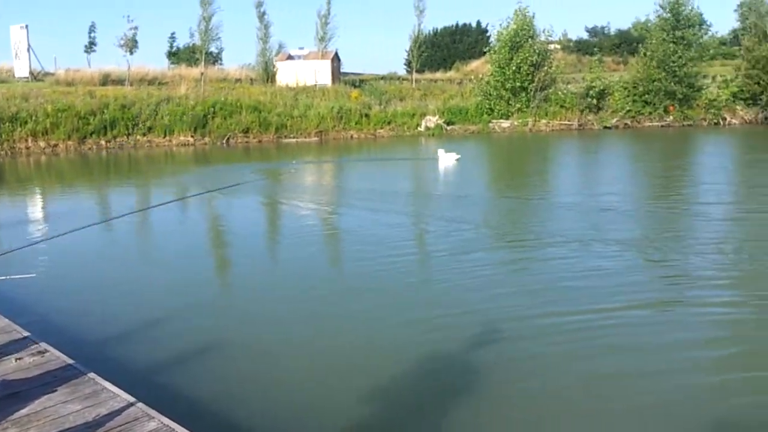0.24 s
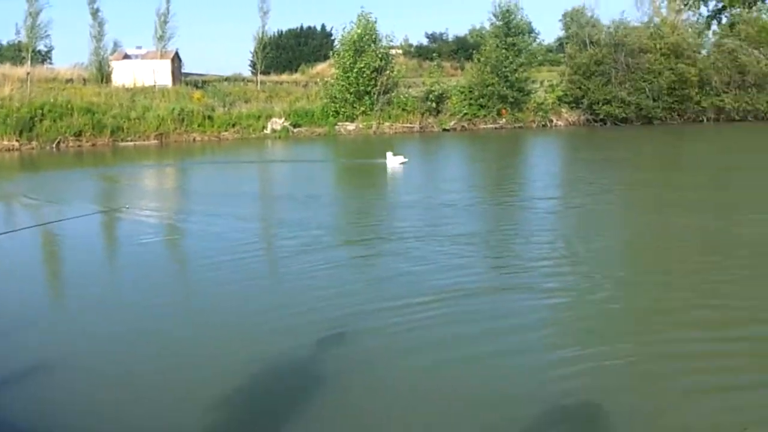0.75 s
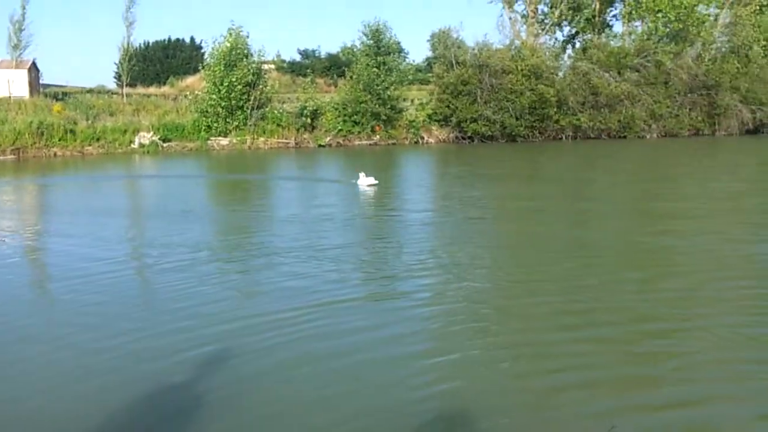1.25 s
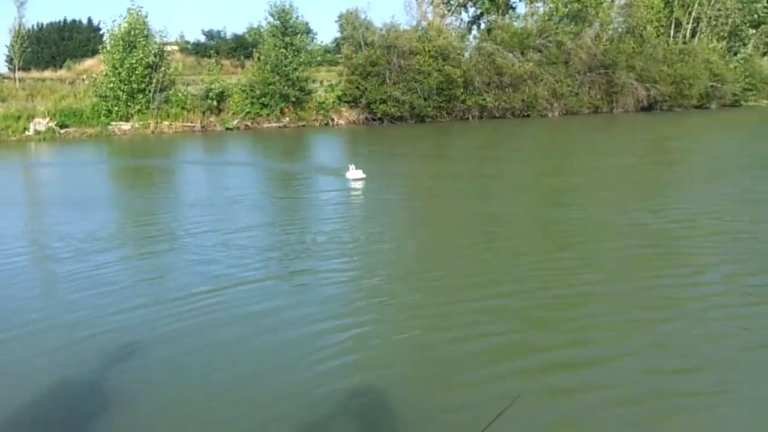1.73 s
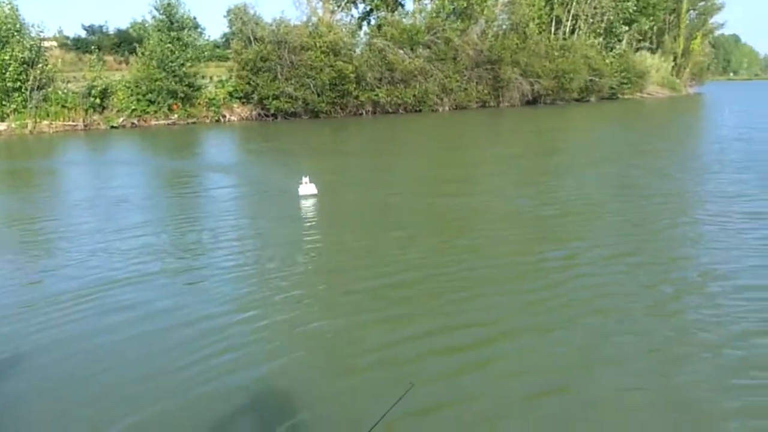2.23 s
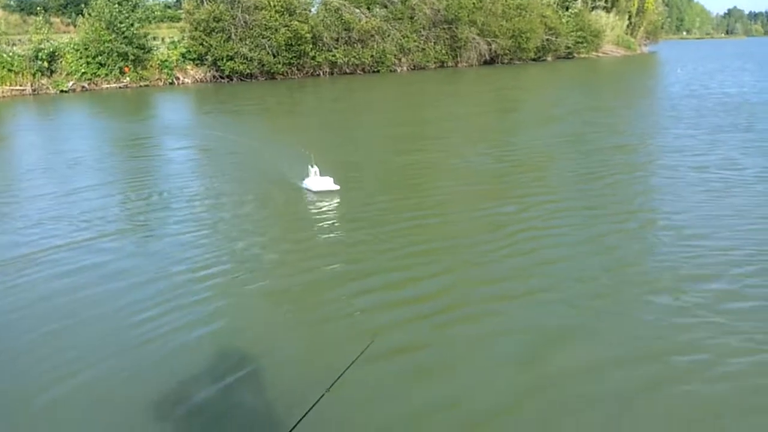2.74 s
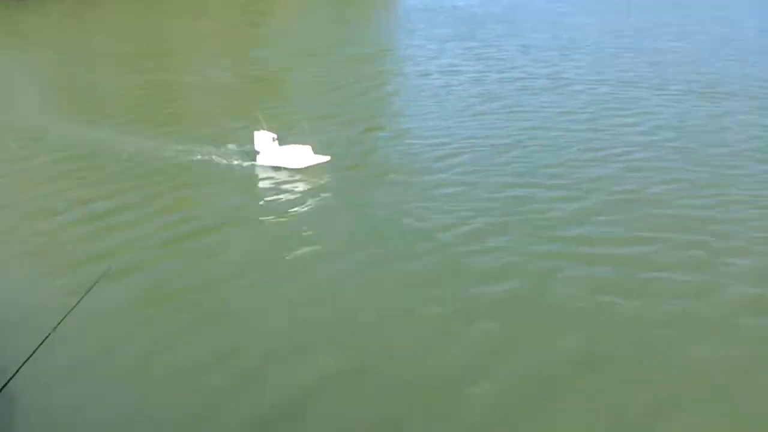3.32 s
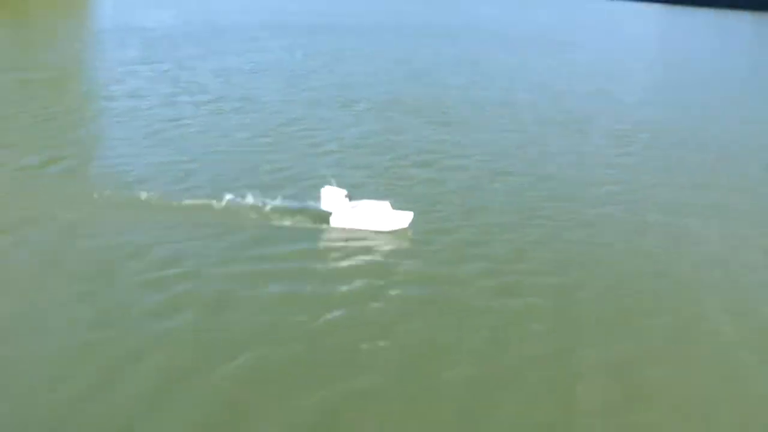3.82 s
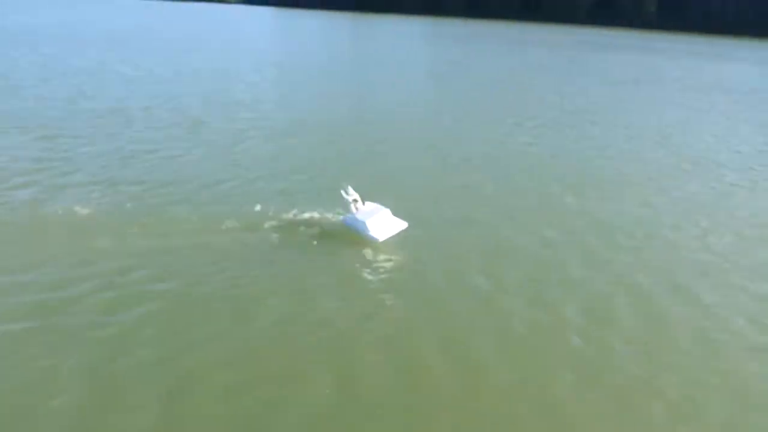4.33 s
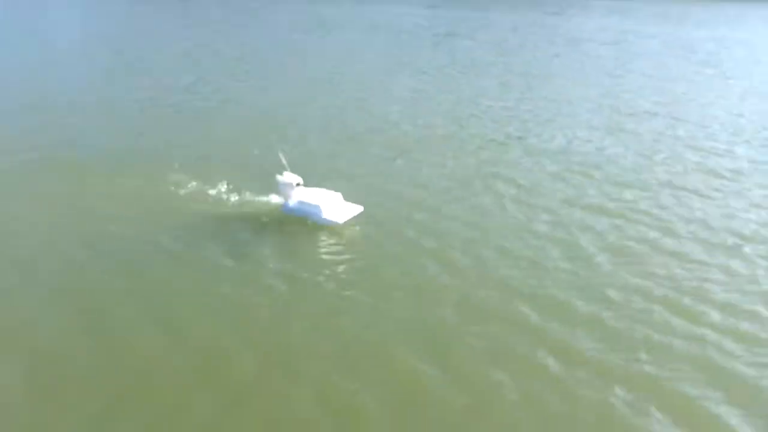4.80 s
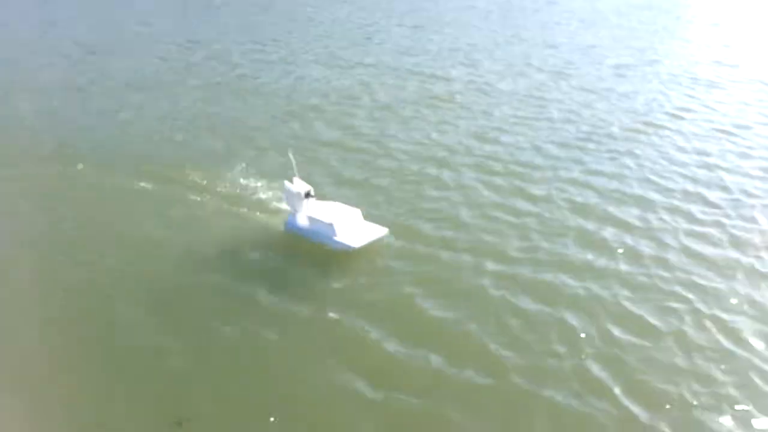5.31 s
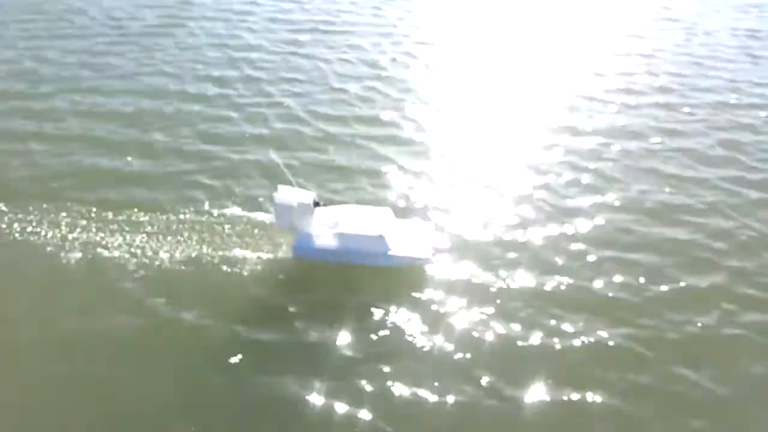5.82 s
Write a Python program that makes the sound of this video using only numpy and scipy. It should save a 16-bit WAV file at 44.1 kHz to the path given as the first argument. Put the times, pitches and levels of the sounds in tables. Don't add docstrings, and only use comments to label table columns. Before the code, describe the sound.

A model airboat runs steadily across open water towards a hand-held camera. At first harsh, overloaded wind slaps and tearing crackles nearly cover its low rasping drone. The wind breaks up into separate knocks, mostly gone past four seconds, leaving the fast propeller's buzzing hum, bright rough hiss and faint high electric singing, close and slightly hollow from reflection off the lake.

```python
import sys
import numpy as np
from scipy import signal
from scipy.fft import rfft, irfft, next_fast_len
from scipy.io import wavfile
from scipy.ndimage import uniform_filter1d, minimum_filter1d, map_coordinates

SR = 44100
rng = np.random.default_rng(int(sys.argv[2]) if len(sys.argv) > 2 else 0)


def dump(signal):
    limited = np.clip(np.atleast_2d(signal).T, -1, 1)
    pcm = np.round(limited * 32767).astype(np.int16)
    wavfile.write(sys.argv[1], SR, pcm)


def elevation(decibels):
    levels = np.asarray(decibels, float)
    return 10 ** (levels / 20)


N = 267246
TOP_HZ = 14650


def unit(x):
    return x / np.sqrt(np.mean(x ** 2) + 1e-20)


def along(points, hz):
    f, v = np.transpose(points)
    return np.interp(np.log(hz + 1), np.log(f + 1), v)


def curves(rows):
    s, *cols = np.transpose(rows)
    return [np.interp(np.arange(N) / SR, s, c) for c in cols]


def wobble(rate):
    coarse = np.arange(0, N + 16, 16)
    knots = rng.standard_normal(N // 100)
    return np.interp(np.arange(N), coarse, map_coordinates(knots, [coarse * rate / SR]))


def filtered(x, response):
    m = next_fast_len(N + 8192)
    return irfft(rfft(x, m) * response(np.fft.rfftfreq(m, 1 / SR)), m)[..., :N]


def passing_db(rows, edge_s, rest_db):
    t = np.arange(0, N / SR, .002)
    start, hold, db = np.transpose(rows)[:, :, None]
    rise = (t - start) / edge_s[0]
    fall = (start + hold - t) / edge_s[1]
    shape = np.clip(1 + np.minimum(rise, fall), 0, 1) ** 2
    power = elevation(2 * rest_db) + np.sum((elevation(db) * shape) ** 2, axis=0)
    return np.interp(np.arange(N) / SR, t, 10 * np.log10(power))


def bumps_db(rows):
    t = np.arange(0, N / SR, .001)
    s, ms, db = np.transpose(rows)[:, :, None]
    bumps = db * np.exp(-((t - s) * 1000 / ms) ** 4)
    return np.interp(np.arange(N) / SR, t, np.sum(bumps, axis=0))


def rush(spectrum, patchy_db, spiky_db=0, shade=None):
    kicks = rng.standard_normal(N) * elevation(spiky_db * wobble(300))
    bins, s, z = signal.stft(kicks, SR, nperseg=512)
    patches = uniform_filter1d(rng.standard_normal(z.shape), size=5, axis=0)
    patches = uniform_filter1d(patches, size=10, axis=1)
    gain = elevation(patchy_db * unit(patches))
    if shade:
        gain = gain * shade(bins, s)
    noise = signal.istft(z * gain, nperseg=512)[1][:N]
    return unit(filtered(noise, lambda hz: elevation(along(spectrum, hz))))


def tone(order, db, angle, unsteady_db):
    shake = np.sqrt(order) * (.2 * wobble(12) + .17 * wobble(50))
    flutter_db = unsteady_db * min(order, 12) ** .5 * (.14 * wobble(30) + .4 * wobble(110))
    return np.sqrt(2) * elevation(db + flutter_db) * np.sin(order * angle + shake + rng.uniform(0, 2 * np.pi))


# (t/s, lower band f/Hz, upper band f/Hz, level/dB)
HULL_SHADOW = [(0, 1950, 2750, -3), (2.3, 1970, 2730, -2), (3.1, 2030, 3000, -3), (3.8, 2150, 3130, -2.5),
               (4.15, 2380, 3260, -3), (4.45, 2190, 3170, -3.5), (4.7, 2300, 3240, -7),
               (5.3, 2370, 3220, -6.5), (5.649, 2700, 2950, -3), (6.06, 2750, 2940, -4.5)]


def shadow(hz, s):
    at, low_hz, high_hz, db = np.transpose(HULL_SHADOW)
    width_hz = 148

    def dip(centre_hz):
        return np.exp(-((hz[:, None] - np.interp(s, at, centre_hz)) / width_hz) ** 2)

    return elevation(np.interp(s, at, db) * (1.04 * dip(low_hz) + dip(high_hz)))


# (t/s, delay/ms)
WATER_ECHO = [(0, 1.62), (1.3, 1.68), (2.4, 1.62), (3.2, 1.46), (3.85, 1.42), (4.1, 1.31), (5.15, 1.3),
              (5.55, 1.16), (5.8, 1.07), (6.06, 1.0)]


def over_water(x):
    late = np.arange(N) - curves(WATER_ECHO)[0] * SR / 1000
    gain = .56 * elevation(2 * wobble(6))

    def bounce(hz):
        ripples = .4 + .6 / (1 + (hz / 8600) ** 6)
        hull = 1 - .6 / (1 + (hz / 3600) ** 8)
        return ripples * hull

    echo = filtered(np.array([map_coordinates(v, [late]) for v in x]), bounce)
    return x + gain * echo


# (t/s, f/Hz)
SHAFT_SPEED = [(0, 212), (.4, 213.5), (1.05, 214.5), (1.45, 217.6), (2.2, 218), (2.5, 216.6), (3.05, 213.8),
               (3.45, 213.4), (3.9, 212.3), (4.33, 212.3), (4.48, 213.1), (4.9, 213.2), (5.4, 213.6),
               (5.78, 213.4), (6.06, 212.7)]
# (t/s, level/dB)
HISS_LEVEL = [(0, -25.5), (.2, -31), (.98, -31), (1.06, -22), (1.2, -16.5), (1.66, -18), (1.73, -28),
              (2.0, -26.5), (2.09, -17), (2.9, -13), (3.13, -16.5), (3.4, -13.5), (3.56, -15.5),
              (4.14, -17), (4.44, -11), (4.65, -14.5), (5.1, -12.5), (6.06, -12.5)]
# (start t/s, hold t/s, level/dB over the hiss)
BLADE_SWEEPS = [
    [(0, 0.24, 2), (.55, .1, 6), (1.05, 0.42, -6), (2, 0.046, -5), (3.04, 0.23, -4), (4.1, 0.32, -3.5),
     (4.6, 0.37, -4.5), (5.1, 0.39, -9), (5.6, 0.2, -5.5)],
    [(0, 0.26, 2.5), (1, 0.17, -8), (2, 0.4, -17), (3.05, 0.1, -6.5), (3.4, 0.047, -2), (3.66, 0.075, 5),
     (3.86, 0.25, 4.5), (4.5, 0.25, -12.5), (5.85, 0.13, -8)],
    [(0, 1.8, -7), (1.2, 0.23, -5.5), (1.8, 0.5, -3), (3.42, 0.6, -7), (4.6, 0.083, -10.5),
     (5.65, 0.32, -7.5)],
    [(.5, 1, -14), (1.2, 0.57, -10.5), (2.05, 0.57, -11.5), (3.15, 0.12, -14), (5.45, 0.17, -16.5),
     (5.68, 0.19, -5)],
]
# (start t/s, hold t/s, level/dB over the hiss)
MOTOR_SWEEPS = [
    [(0, .3, -19), (1.7, 0.5, -13), (3, 0.053, -10), (5.35, 0.15, -21)],
    [(2.55, 0.15, -25), (3.65, 0.3, -25), (4.3, 0.21, -15), (4.75, 0.56, -19), (5.75, 0.33, -28)],
]
# (start t/s, hold t/s, level/dB over the hiss)
FRAME_SWEEPS = [
    [(.3, .1, -13), (1.3, 0.74, -14.5), (2, .7, -17.5), (3.85, 0.29, -13), (4.6, 0.16, -17.5),
     (5.6, 0.2, -15)],
    [(0, 0.35, -10), (5.45, 0.35, -14)],
    [(.03, 0.19, -2), (1.95, 0.15, -17), (2.6, 0.075, -38), (4.25, 0.16, -18.5), (4.75, 0.26, -21.5),
     (5.45, 0.53, -18)],
    [(2.75, 0.047, -25), (3.4, .15, -23), (4.35, 0.1, -32), (4.85, 0.43, -34), (5.75, .3, -25)],
    [(3.9, 0.19, -16), (4.3, 0.14, -15), (5, 0.15, -14.5), (5.9, .15, -23)],
    [(3.35, 0.25, -17), (4.55, 0.25, -21), (5.35, 0.21, -21), (5.9, 0.13, -22)],
    [(3.85, 0.68, -21.5), (5.1, 0.13, -19)],
    [(3.081, 0.81, -9)],
    [(.32, .03, -3), (1.45, 0.095, -12.5), (4.4, .1, -16.5), (4.95, 0.53, -17.5), (5.95, .1, -17.5)],
]
RESTING_LEVEL = [-15, -13.5, -17.5, -41, -16.5, -45, -17.5, -36, -23, -25, -26.5, -28.5, -42, -23, -27.5]
# (shaft order, level/dB over the hiss)
FAINT_TONES = [(1, -30.5), (11, -35), ]
# (f/Hz, level/dB per Hz)
LEFT_COLOUR = [(60, -38), (150, -18), (250, -7.5), (540, -13), (1100, -7.5), (2400, -11), (3600, -6.5),
               (5500, -10), (7200, -11.5), (9000, -3.5), (10500, -0.5), (11700, 3), (13000, -4),
               (14500, -9)]
# (f/Hz, level/dB per Hz)
RIGHT_COLOUR = [(60, -55), (150, -21), (250, -11), (540, -13.5), (1100, -6), (2400, -5.5), (3300, -11.5),
                (4000, -4), (4700, 4.5), (5300, 0.5), (6200, -10.5), (8000, -13.5), (11000, -16),
                (14500, -17.5)]
# (f/Hz, lead/radians)
LEFT_LEAD = [(0, 1), (260, 2.5), (1890, 2.5), (2330, 4), (3450, 4), (3790, 1.5), (4480, 2), (4820, 4.5),
             (5600, 4.5), (7410, 5), (7670, 3), (12300, 2.5), (14000, -11), (14500, 10)]
# (f/Hz, likeness 0 to 1)
LIKENESS = [(200, 1), (600, 1), (2500, 0.41), (4000, 0.45), (9000, 0.42), (12000, 0.32)]
# (t/s, half width/ms, level/dB)
GAIN_CONTROL = [
    (.35, 44, 7),
    (.58, 23, 2),
    (.855, 47, 5.5),
    (1.56, 35, -3),
    (2.44, 31, -1.5),
]


def airboat():
    shaft_hz, = curves(SHAFT_SPEED)
    angle = 2 * np.pi * np.cumsum(shaft_hz) / SR
    orders = (2, 4, 6, 10, 42, 22, 8, 9, 12, 24, 18, 20, 26, 3, 14)
    tones = np.zeros(N)
    for order, sweeps, rest_db in zip(orders, BLADE_SWEEPS + MOTOR_SWEEPS + FRAME_SWEEPS, RESTING_LEVEL):
        db = passing_db(sweeps, edge_s=(0.22, 0.36), rest_db=rest_db)
        tones += tone(order, db, angle, unsteady_db=2.49)
    for order, db in FAINT_TONES:
        tones += tone(order, db + 3 * wobble(3.0), angle, unsteady_db=5.0)
    tones *= 1 + 0.15 * np.cos(angle + 0.65 * wobble(7))

    beat = 1 + 0.22 * np.cos(2 * angle) + 0.26 * np.cos(4 * angle + 1.0)
    swell = elevation(1.34 + 0.24 * wobble(14) + 0.78 * wobble(60))
    hisses = np.array([rush(LEFT_COLOUR, patchy_db, shade=shadow) for patchy_db in (0.88, 1.2)])
    shared, own = beat * swell * over_water(hisses)
    heard = elevation(curves(HISS_LEVEL)[0] + bumps_db(GAIN_CONTROL))

    def alike(hz):
        return np.clip(along(LIKENESS, hz), 0, 1)

    def right_port(hz):
        cavity_db = 1.64 / (1 + ((hz - 4700) / 130) ** 2)
        colour_db = along(RIGHT_COLOUR, hz) - along(LEFT_COLOUR, hz)
        return elevation(colour_db + cavity_db) * np.exp(-1j * along(LEFT_LEAD, hz))

    right = tones + filtered(shared, alike)
    right = right + filtered(own, lambda hz: np.sqrt(1 - alike(hz) ** 2))
    return np.array([heard * (tones + shared), filtered(heard * right, right_port)])


# (start t/s, hold t/s, level/dB)
GUSTS = [
    [(0, 6.6, -25), (0, 0.49, -15.5), (.1, 0.081, -17), (.55, 0.28, -16), (1.05, 0.036, -24),
     (1.52, 0.024, -25), (1.98, 0.83, -21.5), (2.95, 0.34, -20.5), (3.36, 0.47, -17), (4.04, 0.19, -17.5)],
    [(0, 3.35, -23.5), (0, 0.0078, -9.5), (.05, 1.1, -15), (.12, 0.31, -15), (1.2, 0.075, -14.5),
     (1.3, 0.56, -18.5), (.2, 0.039, -17), (.42, 0.59, -8.5), (.49, 0.059, -2), (.62, 0.02, -1),
     (.74, 0.061, -3), (.9, 0.034, -9.5), (1.53, 0.022, -9.5), (1.66, 0.13, -8), (1.82, 0.18, -10.5),
     (2.05, 0.44, -17.5), (2.41, 0.04, -12.5), (2.55, 0.31, -18.5), (3.38, 0.025, -33), (3.98, 0.074, -28)],
]
# (t/s, half width/ms, level/dB)
LEFT_LULLS = [
    (.057, 7, -8),
    (.235, 29, -7),
    (.405, 12, -7),
    (.65, 12, -7),
    (.95, 90, 3.5),
    (2.47, 30, -3),
    (3.9, 68, -6),
]
# (t/s, half width/ms, level/dB)
RIGHT_LULLS = [(.03, 4.2, -14), (.065, 8.7, -14), (.155, 9.3, -11), (.32, 27, -11), (.445, 6.2, -8),
               (.468, 5.1, -13), (.505, 5, -17), (.603, 3.7, -18), (.703, 4.5, -14), (.765, 4.2, -12),
               (.805, 5.8, -14), (.838, 14, -9), (.883, 19, -7), (.945, 3.5, -1), (1.02, 19, -3),
               (1.6, 17, 0), (1.685, 4.9, -9), (1.72, 4.3, -6), (1.787, 18, -14), (1.856, 13, -4),
               (1.883, 4.1, 3.5), (1.935, 8.1, -6)]
# (f/Hz, level/dB per Hz)
BUFFET_COLOUR = [(30, -21), (100, -9), (200, -0.5), (350, 2), (550, -3.5), (1000, -7), (2000, -23),
                 (5000, -31.5), (15000, -76)]
# (f/Hz, level/dB per Hz)
TEARING_COLOUR = [(100, -56), (300, 2), (600, 7), (1000, 1), (1500, -10), (2500, -19.5), (5000, -26),
                  (15000, -50)]
# (f/Hz, level/dB per Hz)
CRACKLE_COLOUR = [(300, -14), (800, 7.5), (1500, 11), (2500, -1), (4000, -8), (8000, -39), (15000, -50)]
# (t/s, level/dB, fade/ms)
SUDDEN_TEARS = [(0.082, -23, 8), (0.129, -23, 6.1), (0.231, -5, 31), (.402, -2, 12), (.734, -7, 17),
                (.855, -14, 9.9), (.886, -16, 10), (0.485, 3, 89), (0.524, 25, 11), (.555, -1, 9.4),
                (0.586, 32, 7.6), (0.616, 11, 6.6), (0.66, 35, 15), (0.68, 12, 5.1), (0.81, -14, 5),
                (0.948, -1, 23), (1.691, 8, 9.5), (1.733, 1, 6.1), (1.747, 14, 14), (1.762, -22, 25),
                (1.808, -10.5, 37), (1.865, -9, 8.4), (1.897, 11, 7.8), (1.966, 18, 8.2), (1.913, -3, 7),
                (1.992, 2, 2.2), (2.005, -11, 6.9), (2.435, -6.5, 15)]


def wind():
    left_db, right_db = [passing_db(gusts, edge_s=(0.098, 0.11), rest_db=-68) for gusts in GUSTS]
    left_db = left_db + bumps_db(LEFT_LULLS) - 2.5
    right_db = right_db + 0.56 * bumps_db(RIGHT_LULLS)
    left_lumps, right_lumps = [unit(elevation(2.6 * wobble(40) + 2.5 * wobble(110))) for _ in range(2)]
    left = left_lumps * elevation(left_db) * rush(BUFFET_COLOUR, patchy_db=1.5, spiky_db=4.0)
    right = right_lumps * elevation(right_db) * rush(BUFFET_COLOUR, patchy_db=1.5, spiky_db=4.0)

    tear_db = right_db + 2.7 * (right_db + 7.5)
    tearing = rush(TEARING_COLOUR, patchy_db=4.0, spiky_db=6)
    crackle = rush(CRACKLE_COLOUR, patchy_db=1.5, spiky_db=10)
    steady = tearing + elevation(-19.5 + 6.9 * wobble(109.7)) * crackle
    strength = np.zeros(N)
    t = np.arange(SR // 10) / SR
    for s, db, ms in SUDDEN_TEARS:
        strength[round(s * SR):][:len(t)] += elevation(db) * np.exp(-(t * 1000 / ms) ** 2)
    sudden = strength * (tearing + elevation(-6) * crackle)
    return np.array([left, right + right_lumps * elevation(tear_db) * steady + sudden])


# (t/s, level/dB)
SNAP_TIMES = [(0.0054, -19), (0.0183, -25), (0.2055, -17), (0.2164, -14), (0.234, -26), (0.2527, -18),
              (0.2605, -23), (0.2774, -26), (0.3865, -10), (0.404, -17), (0.4147, -17), (0.439, -10),
              (0.484, -11), (0.506, 4), (0.524, -11), (0.554, -2), (0.5706, 3), (0.594, 0), (0.6244, -14),
              (0.6534, -2), (0.6794, -6), (0.692, -11), (0.716, -21), (0.7564, -18), (0.7801, -15),
              (0.7923, -8), (0.816, -14), (0.8634, -23), (0.909, -21), (0.9304, -13), (0.947, -20),
              (0.9767, -13), (1.6667, -20), (1.6916, -14), (1.733, -11), (1.7494, -11), (1.758, -2),
              (1.7684, -14), (1.802, -14), (1.827, -24), (1.864, -16), (1.8981, -6), (1.905, -20),
              (1.965, 2), (1.991, -10), (2.0083, -23)]
# (f/Hz, level/dB per Hz)
SNAP_COLOUR = [(300, -25), (900, 11.5), (1800, 6.5), (3000, -4), (5000, -18), (9000, -26), (15000, -50)]


def snaps():
    kicks = np.zeros(N)
    for (s, db), (sign, lag) in zip(SNAP_TIMES, rng.uniform(-0.86, 1, (len(SNAP_TIMES), 2))):
        clicks = round(s * SR) + np.array([20, 45 + int(15 * lag)])
        kicks[clicks] = elevation(db + 25) * np.sign(sign) * np.array([1, -.7])
    return filtered(kicks, lambda hz: elevation(along(SNAP_COLOUR, hz)))


# (t/s, peak level/dB, length/ms, f/Hz)
LEFT_SLAPS = [(0.01, -4, 4, 470), (0.039, 5, 6.1, 496), (0.077, -2, 3.8, 380), (0.09, -4, 4.3, 430),
              (0.108, -6, 3.3, 490), (0.129, -9, 6.2, 450), (0.169, -4, 3.8, 470), (0.179, -4, 3.3, 470),
              (0.186, -4, 4.9, 455), (0.307, -4, 4.7, 414), (0.333, -5, 10, 437), (0.363, -9.5, 2.7, 360),
              (0.383, -12, 4.8, 370), (0.425, -4, 3.9, 390), (0.517, -6, 5.2, 370), (0.554, -4, 4.4, 410),
              (0.574, -8, 3.7, 510), (0.614, -14, 5.4, 430), (0.687, -5, 3.7, 480), (0.724, -4, 5.8, 350),
              (0.8, -6, 4.3, 310), (0.808, -8, 3.4, 450), (0.828, 0, 4.4, 390), (1.096, -3, 6.2, 360),
              (2.034, -7, 3.3, 460), (2.345, -7, 4, 473), (2.376, 0, 7, 298), (2.384, -10, 4.6, 330),
              (2.414, -6, 4.3, 504), (2.691, -6.5, 10, 530), (2.989, -9, 7.2, 360), (3.096, -11, 6.1, 537),
              (3.45, -17, 3.6, 776), (3.472, -22, 3.6, 515), (3.536, -4, 6.4, 363), (3.549, -2, 6.8, 430),
              (3.556, -6, 2.1, 540), (3.584, -1.5, 5.1, 440), (3.661, -16, 6.5, 810), (3.721, -3, 3.2, 560),
              (3.764, -11, 4.2, 684), (3.786, -11, 11, 730), (3.801, -7, 4.3, 627), (3.844, -17, 3.7, 825),
              (4.019, -6, 4.4, 800), (4.033, -4, 3.3, 745), (4.09, -13, 3.1, 650), (4.13, -12, 7.9, 710),
              (4.186, -4.5, 4.8, 523), (4.259, -2.5, 7.7, 627)]
# (t/s, peak level/dB, length/ms, f/Hz)
RIGHT_SLAPS = [(0.007, 4, 4.6, 830), (0.019, 1, 4.4, 710), (0.028, 0.5, 4.0, 555), (0.045, -1, 5.3, 650),
               (0.082, -1.5, 4.4, 750), (0.094, -2, 7.6, 640), (0.134, -5, 3, 600), (0.161, 0, 4.4, 547),
               (0.175, -2, 4.2, 500), (0.188, 4, 3.3, 420), (0.196, -4, 2.5, 650), (0.206, -2, 4.4, 710),
               (0.217, 1, 3.4, 750), (0.226, -7, 6.9, 563), (0.251, 0, 4.2, 620), (0.262, -1, 5.6, 700),
               (0.292, -7, 4.2, 544), (0.38, 3, 3.6, 580), (0.404, 0, 9.2, 670), (0.416, -5, 3.5, 640),
               (1.006, -9, 3.8, 410), (1.052, -3, 4.7, 464), (1.062, -4, 7.1, 463), (1.09, 1, 2.8, 513),
               (1.1, 10, 6.9, 520), (1.211, -5, 3.4, 500), (1.218, 12, 4.1, 480), (1.244, -2, 6.1, 480),
               (1.523, 10, 6.2, 503), (1.534, 4, 26, 437), (1.554, 11, 3.8, 580), (1.566, 2.5, 9.2, 586),
               (1.643, -6, 4.3, 470), (1.65, 7, 3.2, 360), (2.17, 5, 5.9, 358), (2.245, 1, 4.2, 470),
               (2.333, 1, 5.4, 556), (2.351, 2, 4.2, 450), (2.398, -5, 3.4, 436), (2.417, -2, 6, 640),
               (2.425, -4, 2.5, 540), (2.431, 1, 8.1, 567), (2.455, 1, 4.6, 480), (2.516, 4, 3.4, 453),
               (2.561, -1.5, 3.9, 400), (3.048, 2, 3.3, 430), (3.154, -2, 7.2, 610),
               (3.197, -5.5, 4.7, 550), (3.369, 3.5, 3.9, 516), (3.394, -9, 2.1, 600)]


def slaps():
    out = np.zeros((2, N + SR))
    t = np.arange(-2000, 2000) / SR
    for port, rows in enumerate((LEFT_SLAPS, RIGHT_SLAPS)):
        for (s, db, ms, hz), (slide, phase, skew) in zip(rows, rng.standard_normal((len(rows), 3))):
            turn = 2 * np.pi * 0.835 * hz * (t + 8 * slide * t * t) + 3 * phase
            swing = np.sin(turn + 1.15 * np.sin(0.477 * turn + skew) + 0.34 * np.sin(2 * turn))
            width = ms / 1000 * np.where(t < 0, .4, .6)
            fade = np.exp(-np.abs(t / width) ** 2.3)
            out[port, round(s * SR):][:len(t)] += elevation(db - 1.0) * fade * swing
    return filtered(out[:, 2000:N + 2000], lambda hz: (1j * hz / (130 + 1j * hz)) ** 2)


def scene():
    mix = airboat() + wind() + slaps()
    mix[1] += snaps()
    return mix


# (f/Hz, level/dB under the mean treble power)
VANISHING_LEVEL = [(60, -12.5), (300, -18.5), (1500, -14.5), (2300, -9), (3250, -7.5), (4300, -17),
                   (5500, -9.5), (7000, -7.5), (8600, -11), (10500, -17), (14000, -11)]
# (t/s, level/dB)
LIMIT_DRIFT = [(0, -2), (2.7, -0.5), (3.35, 3.5), (3.7, 1.5), (4.1, 0.7), (4.4, -2.5), (4.8, 1.3),
               (5.4, -2.5), (5.7, 2.5), (6.06, -0.5)]


def thinned(x):
    hz, _, z = signal.stft(x, SR, window="cosine", nperseg=2048)
    treble_bins = (hz > 2500) & (hz < TOP_HZ)
    treble = np.mean(np.abs(z[:, treble_bins]) ** 2, axis=1, keepdims=True)

    def swap(pair):
        joint = np.array([pair[0] + pair[1], pair[0] - pair[1]]) / np.sqrt(2)
        return np.where(hz[:, None] < 3700, joint, pair)

    bands = swap(z)
    edges = np.r_[0:84:6, 84:174:10, 174:len(hz) - 1:7, len(hz)]
    width = np.diff(edges)
    power = np.add.reduceat(np.abs(bands) ** 2, edges[:-1], axis=1) / width[:, None]
    power = np.repeat(power, width, axis=1)
    frames = np.minimum(np.arange(z.shape[-1]) * 1024, N - 1)
    drift_db = (curves(LIMIT_DRIFT)[0] + 2.2 * wobble(24))[frames]
    limit_db = along(VANISHING_LEVEL, hz)[:, None] + drift_db
    kept = bands * (power > treble * elevation(2 * limit_db))
    return signal.istft(swap(kept), window="cosine", nperseg=2048)[1][:, :N]


def roll_off(x):
    return signal.sosfilt(signal.butter(12, 14940, fs=SR, output="sos"), x)


def record(dry):
    needed = np.minimum(1, 1.12 / (np.abs(dry) + 1e-9))
    limited = dry * uniform_filter1d(minimum_filter1d(needed, size=60), size=40)
    banded = filtered(thinned(limited), lambda hz: hz < TOP_HZ)
    return roll_off(np.clip(banded, -1, 1))


dry = scene()
out = record(dry)
dump(out)
```